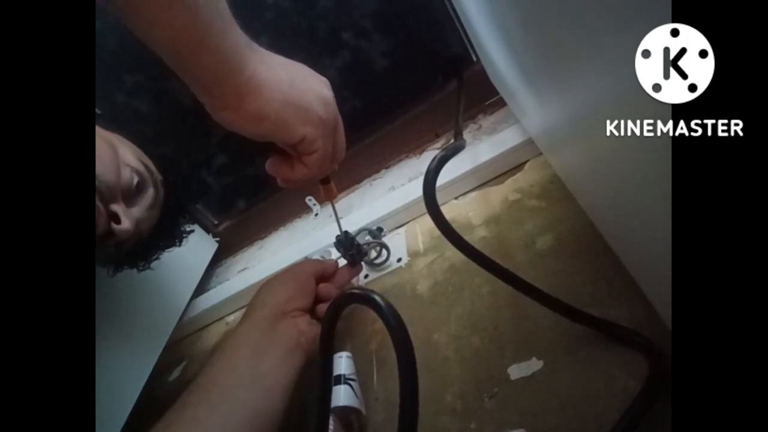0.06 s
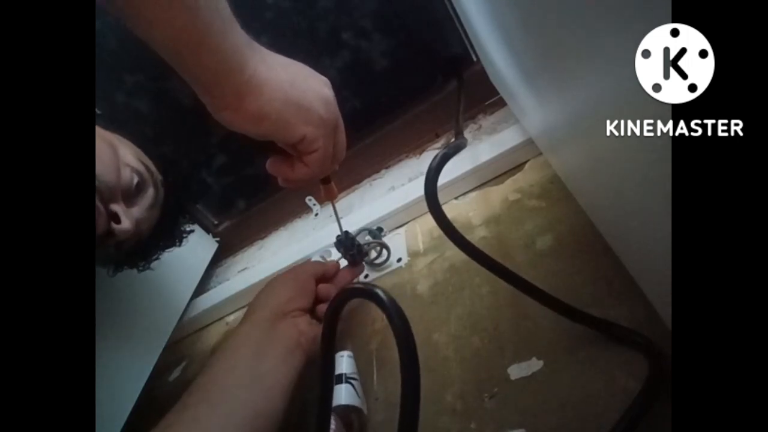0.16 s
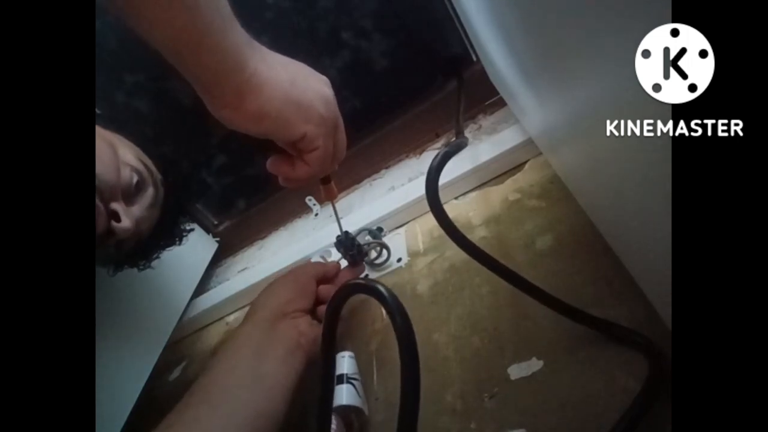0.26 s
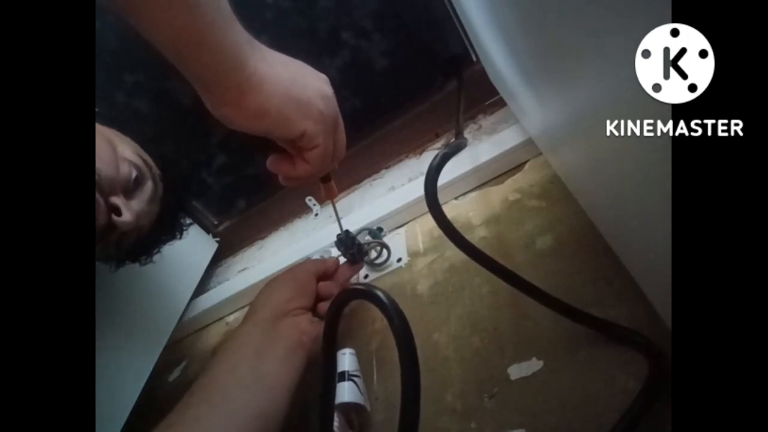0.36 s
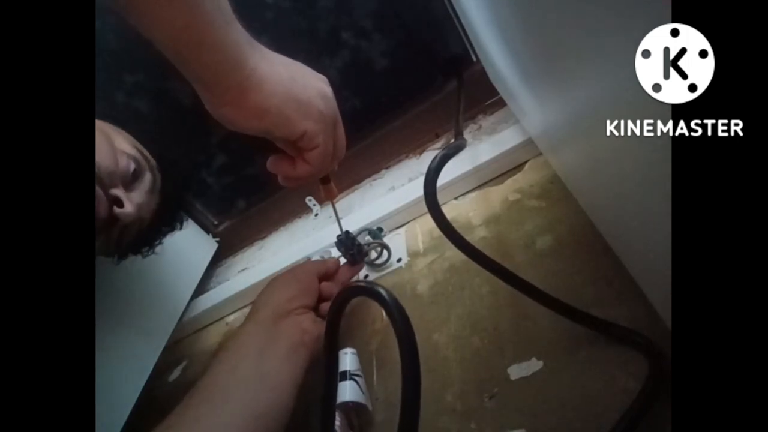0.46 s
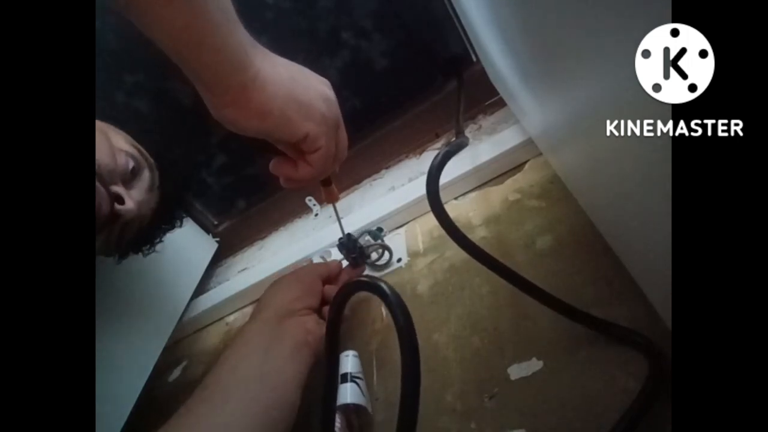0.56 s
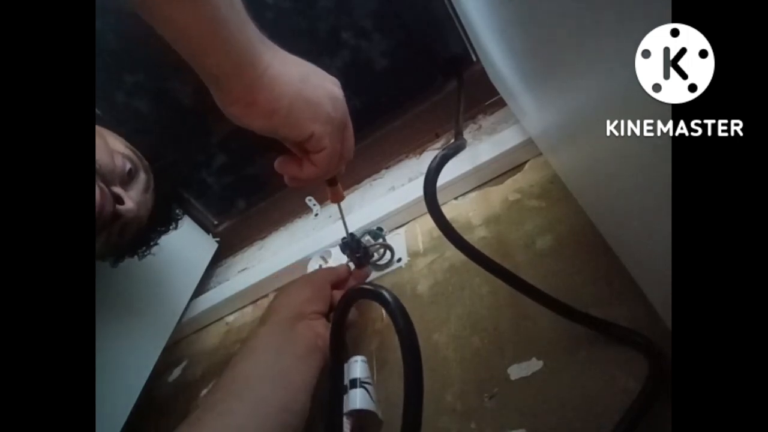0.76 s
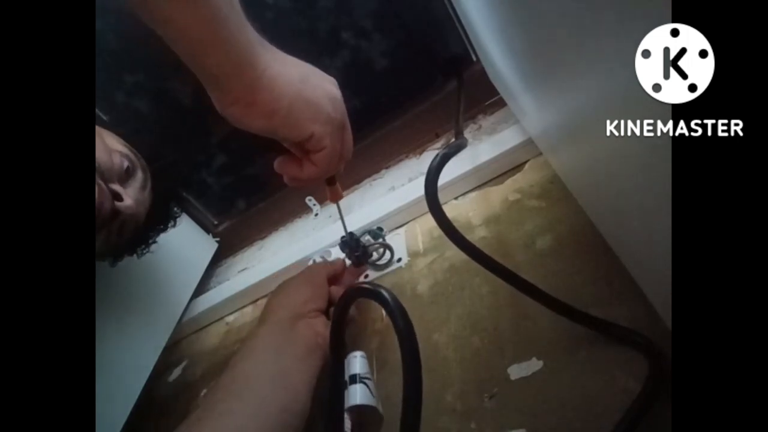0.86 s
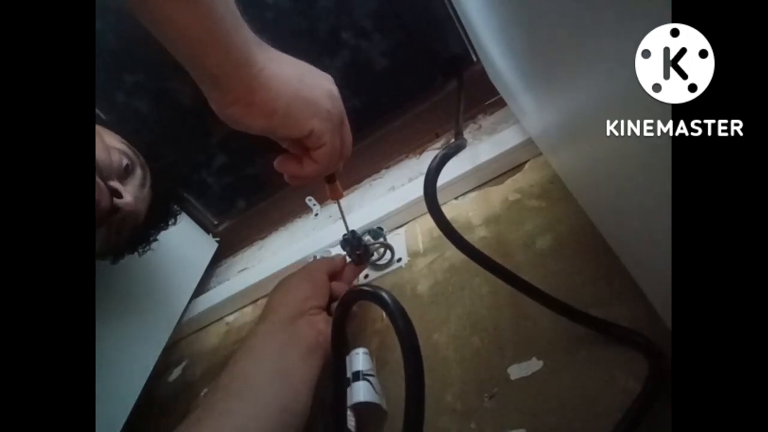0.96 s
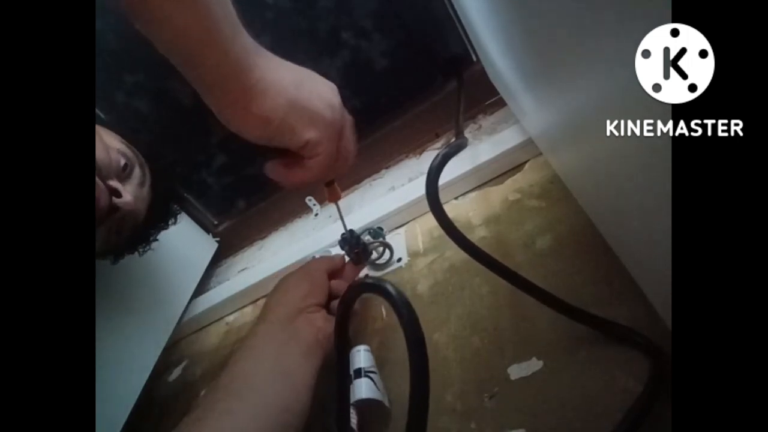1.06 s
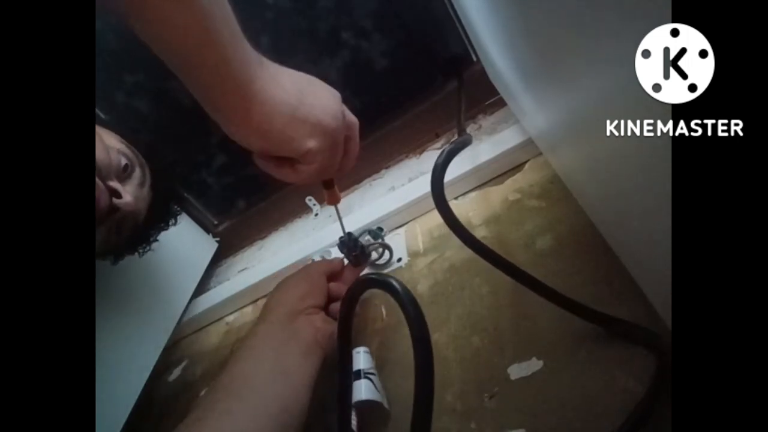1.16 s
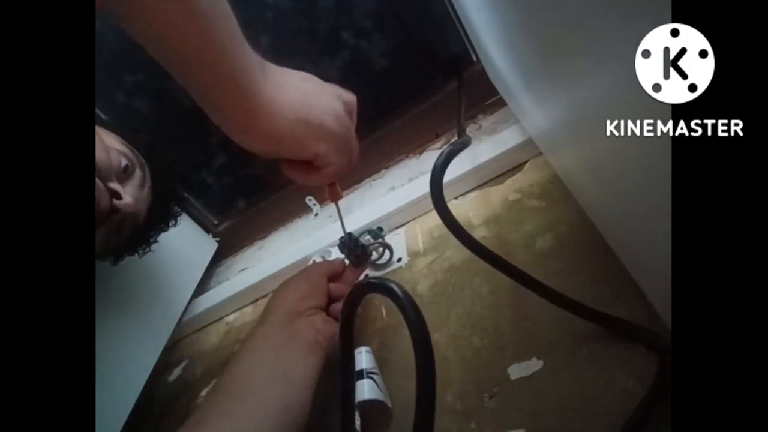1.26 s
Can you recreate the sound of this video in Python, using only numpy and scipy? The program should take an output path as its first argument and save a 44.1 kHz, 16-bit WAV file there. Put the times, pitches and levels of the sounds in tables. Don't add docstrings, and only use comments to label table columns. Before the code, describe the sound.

A stiff cable knocks and bounces on hollow boards with sharp screwdriver clicks on plastic, then slides with a dry hiss and faint squeal; lighter bumps and a late tick follow, close-miked in a small hard room.

```python
import sys
import numpy as np
from scipy import signal
from scipy.fft import rfft, irfft, next_fast_len
from scipy.io import wavfile

SR = 44100
rng = np.random.default_rng(int(sys.argv[2]) if len(sys.argv) > 2 else 0)


def amplitude_ratio(level_db):
    exponent = np.asarray(level_db, float) / 20
    return 10 ** exponent


def generate_wav(signal):
    frames = np.transpose(np.atleast_2d(signal))
    scaled = np.clip(frames, -1, 1) * 32767
    pcm = np.round(scaled).astype(np.int16)
    wavfile.write(sys.argv[1], SR, pcm)


N = 57330

# [f/Hz, level/dB, t60/s]
BLOCK_MODES = [(1130, -10.5, 0.0059), (1649, -3.5, 0.011), (1850, -4.5, 0.012), (2153, 1, 0.011),
               (2702, 5.5, 0.013), (3345, 1, 0.0093), (3855, 5, 0.0057), (4900, -5.5, 0.0032),
               (5360, -6.5, 0.0053), (6550, -7, 0.005), (7160, -2.5, 0.0037), (8080, -2, 0.004),
               (9720, -12.5, 0.0063), (12200, -11.5, 0.0027)]
# [f/Hz, left minus right/dB]
PORT_BALANCE = [(100, -0.5), (300, -3), (650, 4.5), (1400, 3), (3500, 0), (7500, 6), (10500, 2.5),
                (14000, -8.5)]
TICK_FLOOR_CUT_HZ = 446


def in_time(rows):
    s, value = np.transpose(rows)
    return np.interp(np.arange(N) / SR, s, value)


def at_hz(points, hz):
    points = np.array(points)
    return np.interp(np.log(hz + 1), np.log(points[:, 0]), points[:, 1])


def rms_one(x):
    return x / np.sqrt(np.mean(x ** 2) + 1e-20)


def drift(rate):
    knots = rng.standard_normal(400)
    return np.interp(np.arange(N) / SR * rate, np.arange(400), knots)


def low_pass(x, hz, order):
    return signal.sosfilt(signal.butter(order, hz, fs=SR, output="sos"), x)


def high_pass(x, hz):
    return signal.sosfilt(signal.butter(2, hz, "high", fs=SR, output="sos"), x)


def pan(db):
    return amplitude_ratio(np.array([[db / 2], [-db / 2]]))


def ring(force, hz, t60):
    r = amplitude_ratio(-60 / (t60 * SR))
    w = 2 * np.pi * hz / SR
    return signal.lfilter([0, np.sin(w)], [1, -2 * r * np.cos(w), r * r], force + 1e-18)


def boards(force):
    # [f/Hz, level/dB, t60/s, left minus right/dB]
    floor_modes = [(107.3, -6.5, 0.1, 0.5), (159, -14.5, 0.17, 4), (190, -43, 0.051, -6),
                   (269.2, -3.5, 0.094, -0.5), (357.7, -11.5, 0.058, -5.5), (485, -33, 0.19, -20),
                   (550, -9, 0.055, 9), (645, -12.5, 0.082, 9), (805, -10, 0.043, 10),
                   (1143, -28, 0.022, 11)]
    upper_from_hz, upper_lag_ms = 450, 0.35
    force = high_pass(force, 122)
    n = np.arange(len(force))
    late = np.interp(n - upper_lag_ms * SR / 1000, n, force, left=0)
    out = 0
    for hz, db, t60, side_db in floor_modes:
        pair = np.array([force, late if hz > upper_from_hz else force])
        out = out + amplitude_ratio(db) * pan(side_db) * ring(pair, hz, t60)
    return out


def knocks(contacts, push_db):
    t = np.arange(N) / SR
    push = np.zeros(N)
    for s, db, ms in contacts:
        push -= amplitude_ratio(db) * np.exp(-8 * ((t - s) * 1000 / ms) ** 2)
    direct = amplitude_ratio(push_db) * pan(-4.0) * high_pass(push, 52)
    return direct + amplitude_ratio(-39.5) * boards(push)


def cable_knocks():
    # [t/s, peak level/dB, contact/ms]
    drops = [(0.0316, -35, 2.8), (0.0472, -62, 1.5), (0.0647, -29.5, 0.84), (0.0827, -36, 0.96),
             (.2482, -14, 0.6), (0.2518, -8, 1.6), (.255, -19, 0.89), (.259, -31.5, 0.79),
             (0.2620, -12.5, 2.1), (0.2695, -22.5, 6.2), (.2766, -12.5, 1.1), (0.286, -25, 6.5),
             (0.2965, -23.5, 2.1), (0.3093, -64, 0.85), (0.3495, -12.5, 2.4), (.357, -21.5, 1.65),
             (.3638, -14.5, 1.47), (.3675, -25, 1.8), (0.372, -30, 5.5), (.3775, -21, 4), (.381, -20.5, 1),
             (0.3891, -15.5, 3.1), (0.3968, -18, 7), (.405, -23, 10), (.439, -25, 3.7), (0.447, -30, 5.6),
             (0.466, -25.5, 5.2), (.475, -25.5, 1.7), (.49, -25, 3.7), (.53, -45, 2.3), (.506, -31, 2.8),
             (.521, -28.5, 2.7), (0.792, -24, 3.05), (.80, -31.5, 2.5), (0.832, -30, 2.4), (.874, -30, 7.3),
             (.964, -38.5, 5.8), (1.2764, -35, 3.1)]
    # [t/s, peak level/dB, contact/ms]
    settles = [(0.429, -35, 3.4), (0.458, -41, 4.9), (0.498, -38, 1.1), (.712, -31, 1.2), (.72, -32, 0.99),
               (0.749, -28.5, 1.15), (.808, -35, 2.3), (0.8358, -27, 2.9), (.842, -65, 4.9),
               (0.848, -58, 4.4), (0.858, -37, 2.5), (.982, -38.5, 9.6), (0.994, -36, 9.1),
               (1.1705, -37.5, 3.2), (1.1745, -27, 1.04), (1.178, -33.5, 2.7), (1.282, -53, 6.4),
               (1.299, -55, 2.2)]
    return knocks(drops, -1.5) + knocks(settles, -5.5)


def hollows():
    # [t/s, peak level/dB, f/Hz, t60/s, left minus right/dB]
    hollow_tones = [(.2185, -34.5, 904, 0.047, 4), (.249, -25, 554.4, 0.12, 12),
                    (.275, -26, 552, 0.052, 18), (.3465, -26, 574.5, 0.095, 14),
                    (.363, -31, 550, 0.043, 12), (.389, -28, 527, 0.054, 14), (.47, -32, 537, 0.089, 8),
                    (0.653, -41, 543, 0.067, 0), (0.656, -35, 1170, .05, 5),
                    (0.3462, -31.5, 2690, 0.027, 7), (.346, -35, 1770, 0.014, 1),
                    (1.1587, -33, 2714, 0.038, 1), (1.1594, -42, 1850, .03, 1),
                    (1.160, -45, 3370, 0.038, 1), (1.1635, -33.5, 805, 0.055, 9),
                    (1.174, -44, 255, 0.074, -9)]
    t, out = np.arange(N) / SR, 0
    for s, db, hz, t60, side_db in hollow_tones:
        age = (t - s).clip(0)
        envelope = amplitude_ratio(db - 60 * age / t60) * (1 - np.exp(-age * hz))
        out = out + pan(side_db) * envelope * np.sin(2 * np.pi * hz * age)
    return out


def block(force, tilt_db, spread_db):
    out = 0
    for k, (hz, level_db, t60) in enumerate(BLOCK_MODES):
        gain = amplitude_ratio(level_db + tilt_db * np.log2(hz / 2500) + spread_db[k])
        out = out + (-1) ** k * gain * pan(at_hz(PORT_BALANCE, hz)) * ring(force, hz, t60)
    return out


def ticks():
    # [t/s, peak level/dB, t60 of the rattle/s, tilt/dB per octave, floor share/dB]
    tick_events = [(0.028, -57, 0.07, 3.5, 11), (0.062, -58.5, 0.04, 11, 15.5),
                   (0.219, -55.5, 0.023, 6.5, -9), (0.219, -53.5, 0.07, -27, -17),
                   (0.237, -49.5, 0.16, 4, 6), (0.2481, -39, 0.026, -2, 18.5), (0.256, -37, 0.03, -6, 19),
                   (0.272, -40.5, 0.013, 0, -2), (0.343, -48, 0.11, -6, -4), (.346, -26.5, 0.03, -8.5, 7.5),
                   (0.372, -43, 0.028, -15, 1), (0.386, -41, 0.032, -9, -11), (.654, -43, 0.07, -14, 5.5),
                   (0.7875, -38.5, 0.032, -8, -19), (1.147, -60, 0.18, 8.5, -21),
                   (1.158, -33.5, 0.043, 1.5, -9), (1.162, -47.5, 0.038, -0.5, -8),
                   (1.196, -54.5, 0.036, 4.5, 12)]
    rattle_per_s, contact_cut_hz, rise_ms = 7000, 11000, 0.28
    t, out = np.arange(N) / SR, np.zeros((2, N))
    grit = rng.standard_normal((2, N)) * (rng.random((2, N)) < rattle_per_s / SR)
    grit = low_pass(grit, contact_cut_hz, 2)
    for s, db, t60, tilt_db, floor_db in tick_events:
        i = int(s * SR)
        age = t[:min(SR // 6, N - i)]
        span = slice(i, i + len(age))
        force = grit[:, span] * amplitude_ratio(db - 60 * age / t60) * (1 - np.exp(-age * 1000 / rise_ms))
        hard = block(force, tilt_db, np.zeros(len(BLOCK_MODES)))
        floor = boards(high_pass(force[0], TICK_FLOOR_CUT_HZ))
        out[:, span] += amplitude_ratio(-9.5) * hard + amplitude_ratio(floor_db - 7) * floor
    return out


def strikes():
    # [t/s, peak level/dB, tilt/dB per octave, floor share/dB]
    strike_events = [(0.2183, -45.5, 9, 8), (.2195, -49, -2, 8), (0.2499, -29.5, -3, 18),
                     (0.2516, -33, -10, -6), (0.26, -34, -12, -8), (.274, -30.5, -12, 2),
                     (0.279, -40.5, -10, 21), (.3460, -24, -3.5, 2), (.3472, -31, -21.5, -14),
                     (0.351, -39, -10, -10), (0.3863, -44, -9, 12), (0.79, -40.5, -2, 6.5),
                     (1.1591, -41, 1, -25), (1.16, -42, -2, -25), (1.1637, -42, 8.5, -18),
                     (1.166, -46, -3, -15)]
    lag_ms, spread_db = 0.15, 3
    lag = np.array([[0], [lag_ms * SR / 1000]])
    out = np.zeros((2, N))
    chance = rng.standard_normal((60, len(BLOCK_MODES)))
    for (s, db, tilt_db, floor_db), spread in zip(strike_events, chance):
        i = int(s * SR) - 20
        age = np.arange(min(SR // 6, N - i)) - (s * SR - i)
        force = amplitude_ratio(db) * np.exp(-.5 * (age - lag) ** 2)
        hard = block(force, tilt_db, spread_db * spread)
        floor = boards(high_pass(force[0], TICK_FLOOR_CUT_HZ))
        out[:, i:i + len(age)] += amplitude_ratio(-10.5) * hard + amplitude_ratio(floor_db - 10.5) * floor
    return out


def air_noise(spectrum):
    # [f/Hz, correlation/1]
    likeness = [(60, 0.43), (240, 1), (950, -0.089), (3770, -0.028), (15000, -0.064)]
    hz = np.fft.rfftfreq(N, 1 / SR)
    mid, side = rfft(rng.standard_normal((2, N)))
    alike = np.clip(at_hz(likeness, hz), -1, 1)
    pair = np.sqrt(1 + alike) * mid + np.sqrt(1 - alike) * side * [[1], [-1]]
    colour = amplitude_ratio(at_hz(spectrum, hz) + at_hz(PORT_BALANCE, hz) * [[.5], [-.5]])
    return rms_one(irfft(pair * colour, N))


def slide():
    # [t/s, level/dB]
    rub_level = [(0, -69.5), (.1, -68), (.15, -93), (.23, -66), (.3, -67.5), (.36, -52), (.43, -46.5),
                 (.48, -39), (.56, -38.5), (.66, -41.5), (.7, -50), (.76, -53), (.79, -57), (.86, -58),
                 (.98, -64), (1.04, -74.5), (1.14, -62), (1.3, -61.5)]
    # [t/s, tilt/dB per octave]
    rub_tilt = [(0, 5.5), (.2, 9), (.4, -3), (.5, 0.1), (.62, 1.5), (.75, 2.2), (.9, 4), (1.1, 5), (1.3, 1)]
    # [f/Hz, level/dB per Hz]
    hiss_colour = [(300, -6.5), (520, -5), (1100, -2), (1700, -7), (3000, -4), (4900, -12), (7300, -12.5),
                   (10000, -24.5), (15500, -33.5)]
    trim_db, ring_db, wobble_db = 4.5, -8, 1
    rung = sum(amplitude_ratio(db) * ring(rng.standard_normal((2, N)), hz, 3.3 * t60) for hz, db, t60 in BLOCK_MODES[:7])
    hiss = air_noise(hiss_colour) + amplitude_ratio(ring_db) * rms_one(rung)
    for edge_hz in (4500, 9500):
        low = signal.sosfiltfilt(signal.butter(2, edge_hz, fs=SR, output="sos"), hiss)
        hiss = low + (hiss - low) * amplitude_ratio(0.89 * in_time(rub_tilt))
    return hiss * amplitude_ratio(in_time(rub_level) + trim_db + wobble_db * drift(24.9))


def squeal():
    # [start/s, end/s, f/Hz, level/dB]
    squeals = [
        (.01, .24, 735, -64),
        (.54, .62, 2099, -50),
        (.5, .64, 2940, -56),
    ]
    t, out = np.arange(N) / SR, 0
    for start, end, hz, db in squeals:
        progress = np.clip((t - start) / (end - start), 0, 1)
        swell = np.sqrt(np.sin(np.pi * progress).clip(0))
        tone = np.sin(2 * np.pi * hz * t + 0.76 * drift(30.0))
        out = out + amplitude_ratio(db) * pan(16.0) * swell * tone
    return out


def rumble():
    # [t/s, level/dB]
    load_level = [(0, -61), (.08, -47.5), (.14, -73), (.21, -60), (.24, -42), (.29, -35), (.335, -42.5),
                  (.4, -32), (.52, -44), (.57, -55.5), (.68, -45.5), (.785, -50), (.80, -46), (.86, -48),
                  (.92, -61.5), (1.0, -66.5), (1.05, -61), (1.15, -59.5), (1.19, -54), (1.3, -67)]
    soft = low_pass(rng.standard_normal(N), 660, 1)
    murmur = boards(soft * amplitude_ratio(2.8 * drift(60.74)))
    return rms_one(murmur) * amplitude_ratio(in_time(load_level) + 1)


def room(x):
    t60_s, wall_cut_hz = 0.072, 7000
    size = next_fast_len(N + SR)
    w = 2 * np.pi * np.fft.rfftfreq(size)
    dull = 1 / (1 + 1j * w * SR / (2 * np.pi * wall_cut_hz))
    lags = rng.uniform(0.0065, .025, (2, 6, 1)) * SR
    loop = amplitude_ratio(-60 * lags / SR / t60_s) * dull * np.exp(-1j * w * lags)
    signs = [[1], [-1], [1], [-1], [1], [-1]]
    echoes = (loop / (1 - loop) * signs).sum(axis=1)
    return irfft(rfft(x, size) * echoes, size)[:, :N]


def room_tone():
    # [f/Hz, level/dB per Hz]
    tone_colour = [(20, -0.5), (119, -7), (185, -18), (298, -9.5), (631, -20.5), (950, -17.5),
                   (1400, -26.5), (2600, -25.5), (15500, -41)]
    return amplitude_ratio(-55.5) * air_noise(tone_colour)


def scene():
    hits = cable_knocks() + hollows() + ticks() + strikes()
    hits = high_pass(hits, 92)
    friction = slide() + squeal() + rumble()
    return hits + amplitude_ratio(-12) * room(hits) + friction + room_tone()


def roll_off(x):
    return signal.sosfilt(signal.butter(12, 15680, fs=SR, output="sos"), x)


def record(dry):
    below_cut = np.fft.rfftfreq(N, 1 / SR) < 15680
    mix = irfft(rfft(dry) * below_cut, N) - .001
    return roll_off(mix)


dry = scene()
out = record(dry)
generate_wav(out)
```